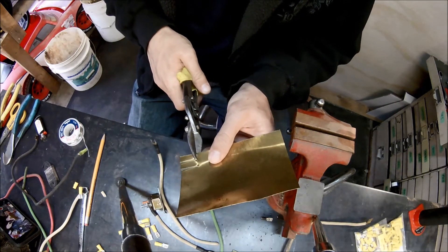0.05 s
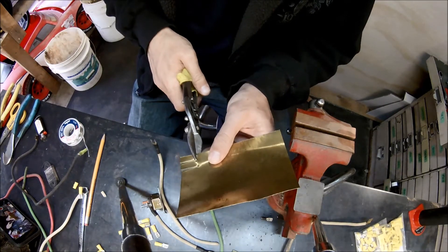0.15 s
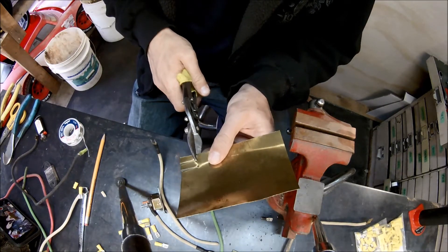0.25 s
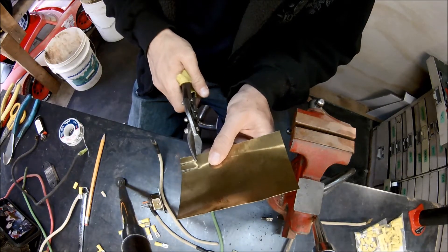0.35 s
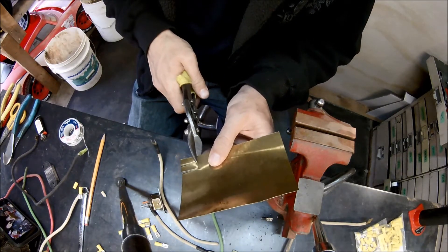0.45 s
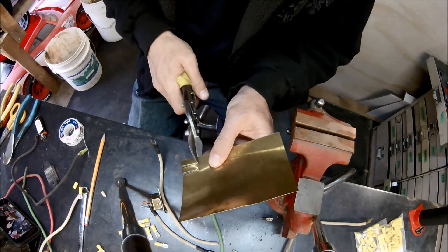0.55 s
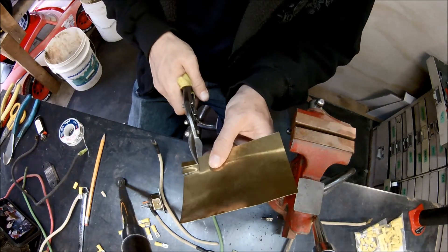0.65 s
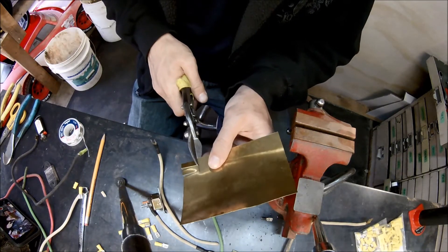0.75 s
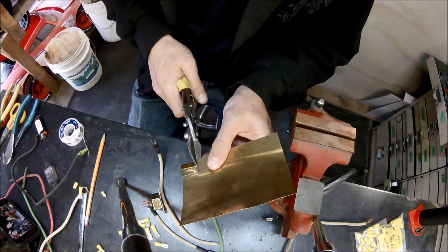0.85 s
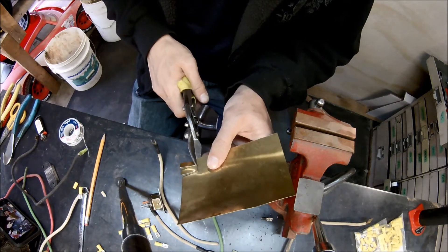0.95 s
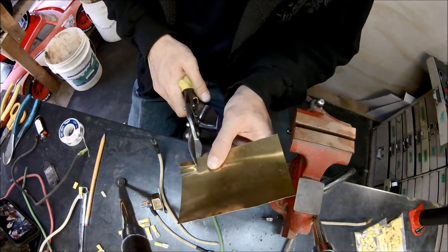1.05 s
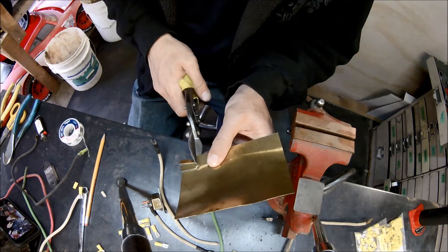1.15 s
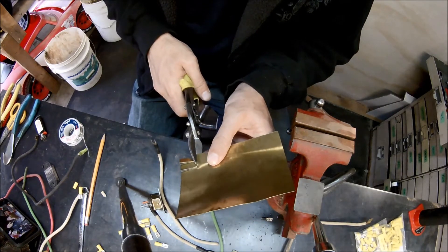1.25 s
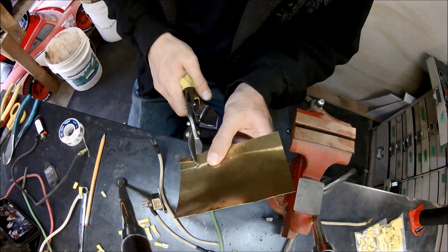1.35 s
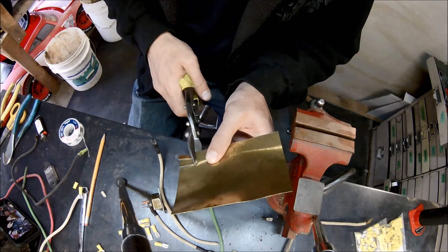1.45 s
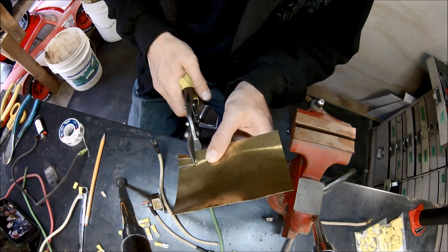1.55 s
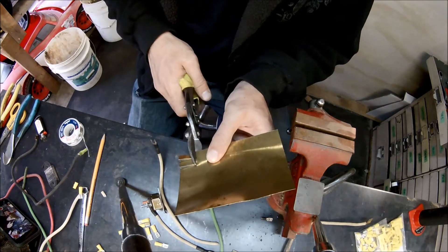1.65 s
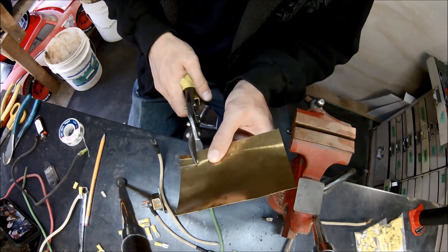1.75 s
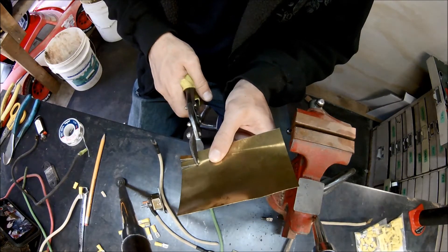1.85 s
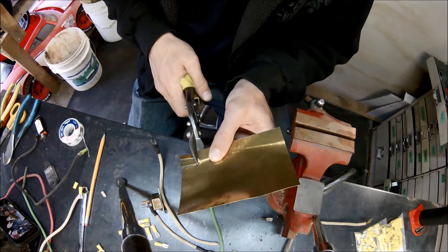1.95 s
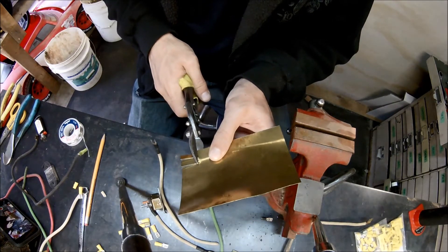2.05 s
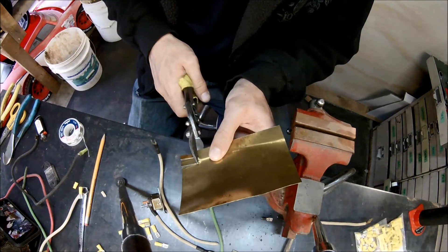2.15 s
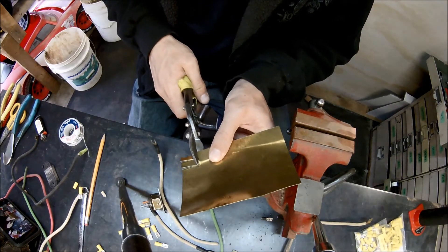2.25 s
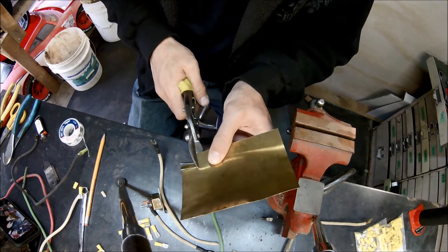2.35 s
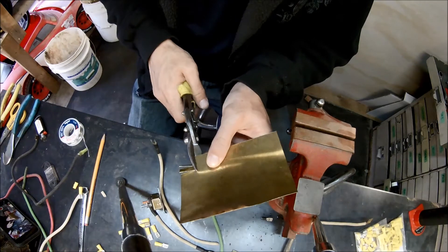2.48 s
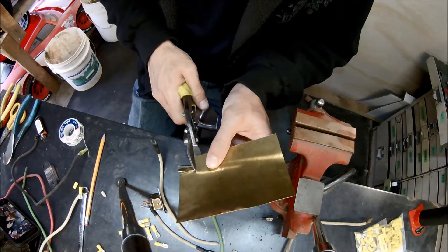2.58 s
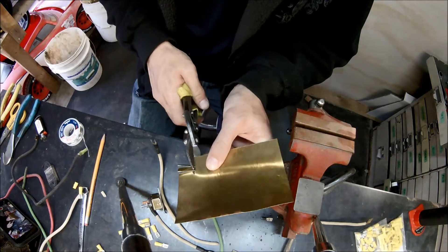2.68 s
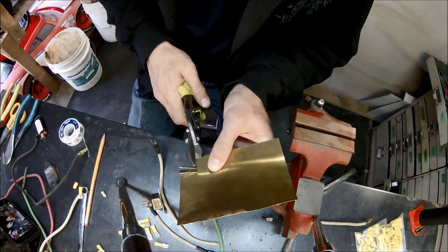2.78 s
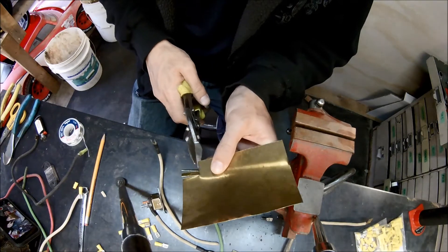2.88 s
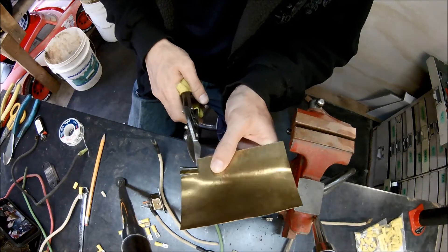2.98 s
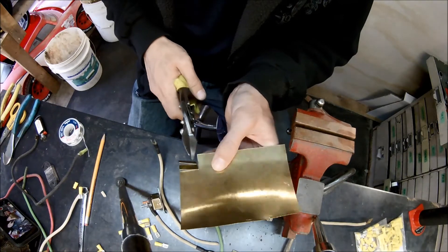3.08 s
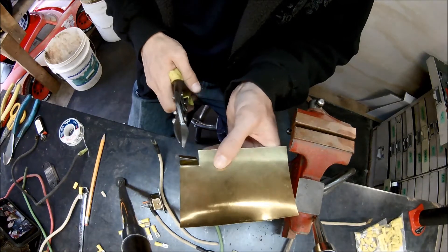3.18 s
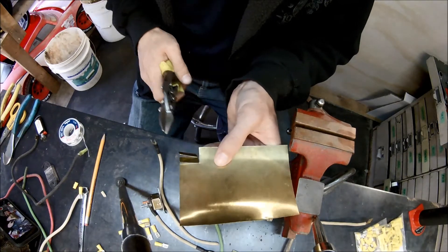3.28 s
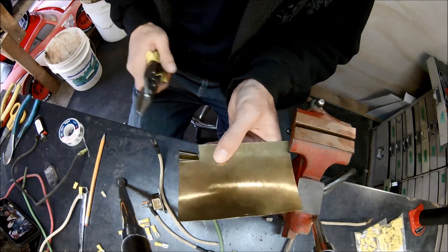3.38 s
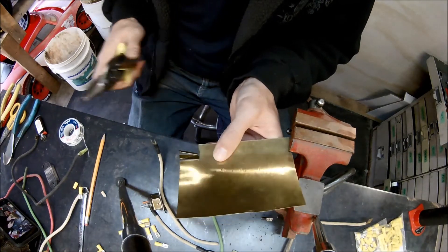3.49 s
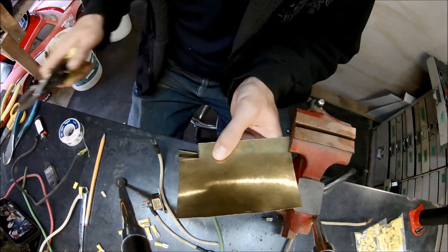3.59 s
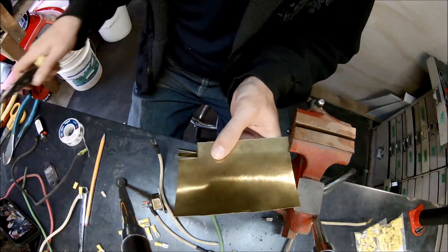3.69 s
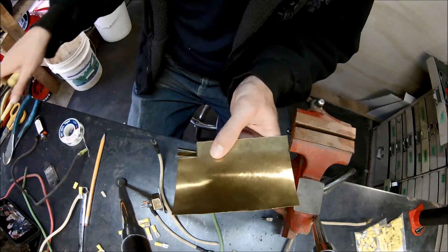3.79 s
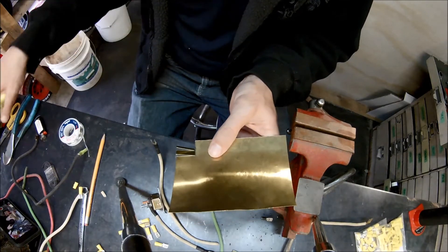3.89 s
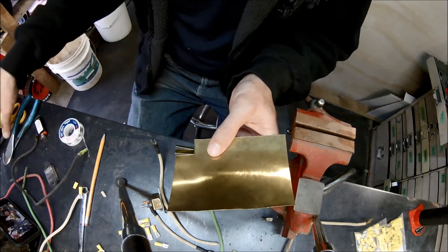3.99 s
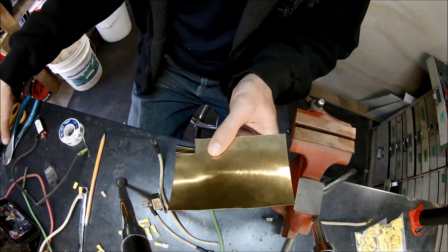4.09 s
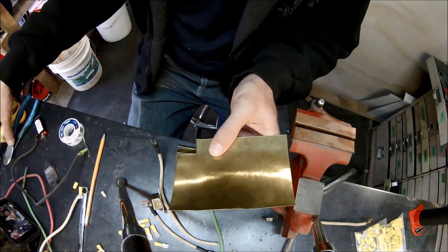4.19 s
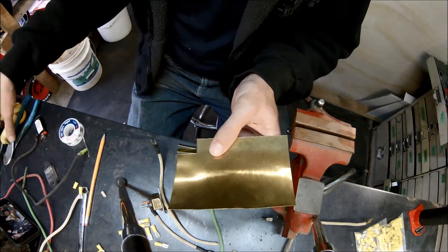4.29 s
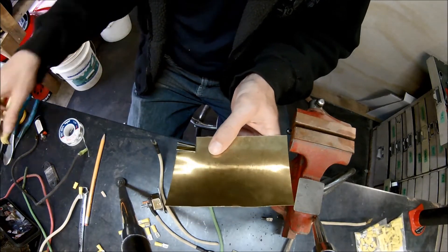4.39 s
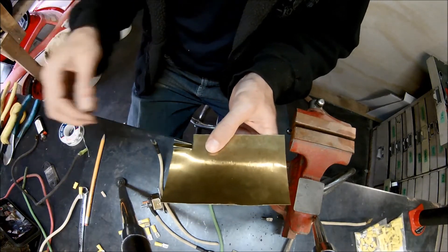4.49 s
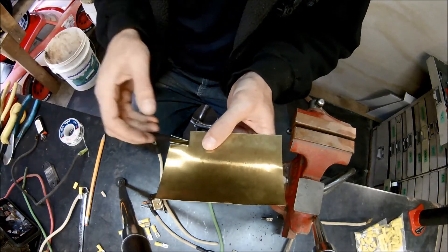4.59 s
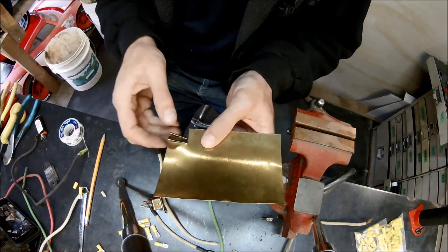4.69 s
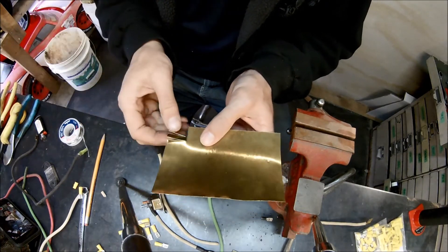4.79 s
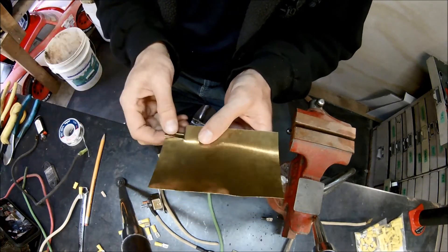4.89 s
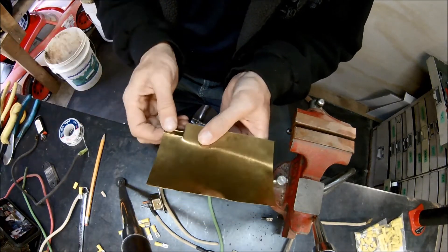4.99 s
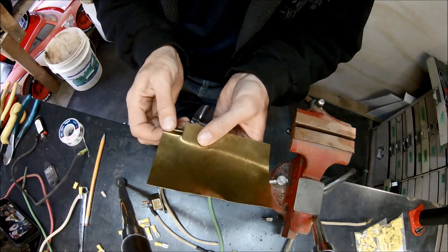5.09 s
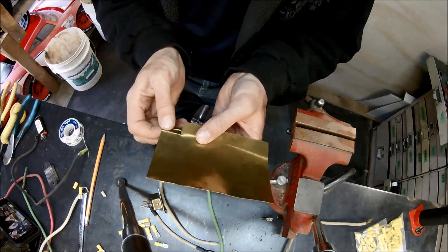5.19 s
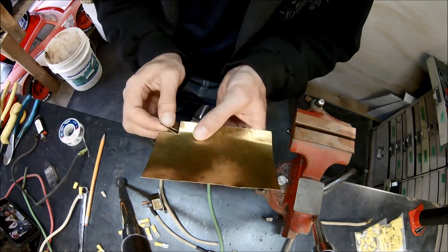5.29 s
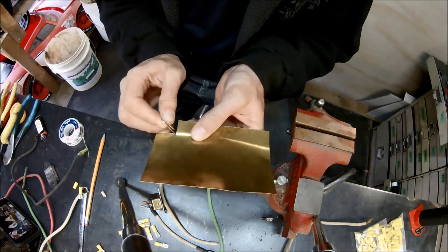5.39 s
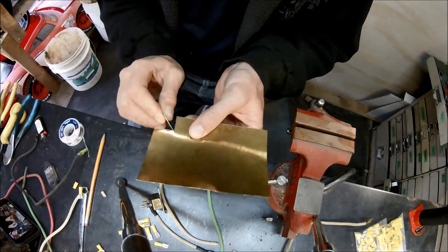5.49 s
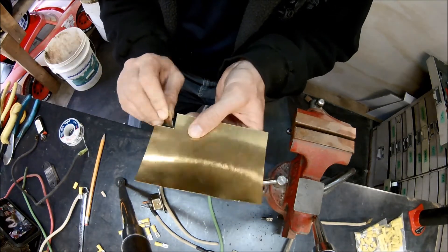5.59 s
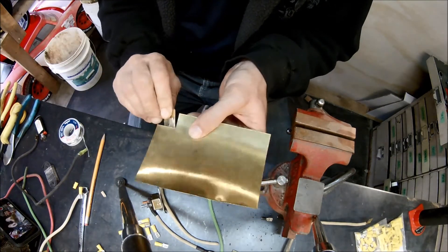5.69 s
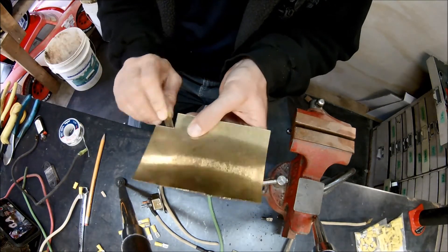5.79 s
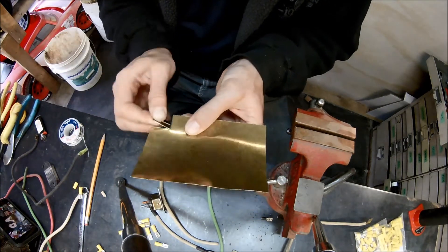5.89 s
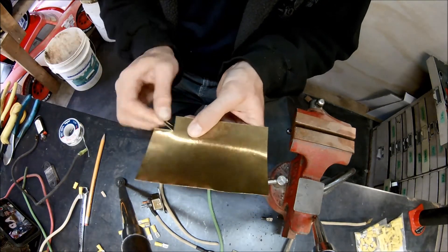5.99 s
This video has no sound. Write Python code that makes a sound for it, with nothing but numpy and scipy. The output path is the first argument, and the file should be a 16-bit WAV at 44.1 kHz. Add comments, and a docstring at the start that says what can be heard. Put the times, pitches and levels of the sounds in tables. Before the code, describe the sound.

Close dry clicks of snips nibbling thin brass, a dull low rumble, tools knocked down onto a bench, then a soft brief singing metal tab.

```python
"""Room tone of a small quiet workshop, then close ticks: hand snips nibble a thin brass sheet over a bench.
Each bite sends a burst of chatter into the sheet's decaying modes and a coloured noise rasp; grit makes
the scrapes, and noise bands a low rumble. The snips go down on a cluttered bench: modes, rattle, clinks
and a thud. Fingers bend the cut tab, which sings once as a gliding tone and ticks. Near sounds get a
short room tail and a microphone housing's shading; hum and hiss lie behind."""
import sys
import numpy as np
from scipy import signal
from scipy.fft import rfft, irfft
from scipy.io import wavfile

SR = 44100
rng = np.random.default_rng(int(sys.argv[2]) if len(sys.argv) > 2 else 0)


def transcribe(u):
    """Save the signal u as a 16-bit wav file named by the first command-line argument.

    u: samples, shape (n,) or (channels, n), limited to [-1, 1]; the rate is SR.
    q: integer samples, one column per channel.
    """
    v = np.clip(np.atleast_2d(u).T, -1, 1)
    q = np.round(v * 32767).astype(np.int16)
    wavfile.write(sys.argv[1], SR, q)


N = 266496
T = np.arange(N) / SR

# modes of the brass sheet before the grip damps them: (frequency [Hz], level [dB], t60 [s])
SHEET_MODES = [(290, 9, 0.088), (407, 9.5, 0.066), (495, -2.5, 0.32), (707, -8, 0.25), (756, 0.5, 0.19),
               (826, -1, 0.23), (906, 2, 0.13), (1086, -10, 0.27), (1110, -4, 0.13), (1250, -7, 0.08),
               (1285, -3, 0.041), (1447, -4, 0.041), (1589, -3.5, 0.056), (1807, -9.5, 0.12),
               (1927, -0.5, 0.042), (2080, -6, 0.05), (2185, -4.5, 0.09), (2390, -3, 0.07),
               (2537, -20, 0.14), (3060, -9, .1), (3490, -15, 0.088), (3410, -1.5, 0.048),
               (3900, -20, 0.058), (3756, -8, 0.09), (4110, -6, 0.05), (4380, -15, 0.11), (4900, -8, .06),
               (5630, -17, .12), (6550, -1.5, .08)]
# ticks on the sheet: (time [s], dry peak [dB], colour centre [Hz], bright edge level [dB], grip t60 [s])
SHEET_TICKS = [(0.582, -48, 1330, -20, .02), (.651, -57, 1240, -27, .03),
               (0.6709, -37.5, 1470, -11.5, 0.034), (.677, -39.5, 1470, -18, 0.039),
               (0.705, -43, 1320, -16, 0.044), (.71, -33, 1580, -14, .036), (1.067, -48, 1200, -25, .042),
               (1.0794, -21.5, 1700, -15.5, 0.029), (1.095, -42, 1295, -5, 0.085),
               (1.12, -46, 1500, -4, 0.044), (1.128, -45, 1800, -1, 0.034), (1.277, -53, 1480, -17, 0.13),
               (1.298, -51, 1170, -21, 0.098), (1.46, -51, 1340, -27, .02), (1.5074, -40, 1300, -11, 0.055),
               (1.516, -46, 1200, -18, .045), (1.53, -54, 1210, -20, .066), (1.546, -44, 1300, -20, .06),
               (1.556, -51.5, 1410, -12, .067), (1.578, -49.5, 1100, -20, 0.047),
               (1.649, -51, 1380, -14, .022), (2.3778, -41.5, 1360, -11, 0.033),
               (2.392, -45, 1320, -15, 0.042), (2.4, -46, 1500, -14, 0.051), (2.413, -47, 1310, -13, 0.036),
               (2.4242, -31, 1370, -18, 0.059), (2.451, -46, 1590, -15, .042),
               (2.708, -40.5, 1880, -7, .038), (2.712, -30, 1870, 19.5, 0.051),
               (2.755, -58.5, 2030, 4, .044), (2.833, -51.5, 1300, -15, .04), (2.869, -51, 1300, -20, .062),
               (2.885, -53, 980, -21, .044), (3.2779, -39.5, 1940, -22, .09),
               (3.287, -45, 2150, -17, 0.051), (3.443, -48, 1150, -4, .0091), (4.905, -66, 1700, -16, .086),
               (5.125, -57, 1710, -20, .084), (5.201, -59, 1810, -20, .045), (5.34, -55, 1493, -6, .07),
               (5.362, -45, 1560, -17, 0.043), (5.369, -43, 1400, -20, 0.047)]
# bright tones of the cut edge and blades: (frequency [Hz], half-width at -6 dB [octaves], level [dB])
EDGE_TONES = [(3720, 0.15, -0.5), (5760, 0.1, -15), (6740, .08, -21)]
# modes a grip leaves free, ringing on after a tick: (time [s], dry peak [dB], frequency [Hz], t60 [s])
FREE_RINGS = [(.71, -54, 915, 0.21), (.728, -58, 1640, .14), (1.5076, -49.5, 720, .072),
              (1.546, -57, 870, 0.068), (2.392, -46, 1316, .1), (2.413, -46.5, 1300, 0.13),
              (2.4244, -51, 1132, 0.28), (2.712, -54.5, 926, 0.29), (2.712, -46, 3480, .11),
              (2.712, -48, 4030, .09), (2.833, -47.5, 926, .08), (2.87, -65, 2235, 0.28),
              (2.885, -50, 885, 0.047), (3.2777, -44.5, 480, .042), (3.287, -56, 1150, .13),
              (4.905, -61, 874, .13), (5.362, -56, 490, .06), (5.364, -47, 862, .1), (5.364, -49, 897, .09),
              (5.365, -51, 1180, .1), (5.365, -55, 1630, .11), (5.365, -54, 1900, .06)]
# blades or fingers rubbing the sheet:
# (time at full level [s], level [dB rms], rise [s], hold [s], fall [s])
SCRAPES = [(0.683, -54.5, 0.0028, .004, .04), (1.297, -64, 0.094, .004, .05),
           (1.518, -59.5, .003, 0.03, .05), (2.386, -61, .003, .03, .01), (2.635, -60, 0.033, .065, .005),
           (2.838, -61.5, .003, .045, 0.055), (4.91, -66, 0.09, .005, .07),
           (5.123, -63.5, .06, .004, 0.055), (5.344, -55.5, 0.036, .01, 0.011),
           (5.372, -54, .004, .008, 0.021), (5.768, -72, .15, 0.0045, 0.076)]
# bench top with its clutter, before extra damping: (frequency [Hz], level [dB], t60 [s])
BENCH_MODES = [(130, -14.5, 0.315), (196, -9, 0.14), (327, 0, 0.11), (383, -2, 0.29), (419.4, -1.5, 0.244),
               (527, -8, 0.19), (630, -12, .2), (732, 0.5, 0.091), (815, 0, 0.094), (841, -6, 0.23),
               (980, -2, 0.14), (1060, -3, 0.16), (1129, -1, 0.18), (1212, -4, 0.17), (1387, -6, 0.26),
               (1533, -6, 0.22), (1932, -4, 0.12), (2840, -13.5, 0.091), (3720, -16, .12), (3900, -17, .1),
               (4150, -18, .1)]
# snips meeting the bench:
# (time [s], dry peak of the whole knock, modes and rattle together [dB], treble tilt [dB per octave])
BENCH_KNOCKS = [(4.09, -55.5, -2), (4.139, -36.5, 2.5), (4.159, -37, -1), (4.174, -31, -1),
                (4.188, -31.5, 2.5), (4.209, -37.5, 2), (4.28, -33, 1.1), (4.286, -11, 2.5),
                (4.29, -13.5, 0.6), (4.299, -23, -1.5), (4.309, -24, -1.2), (4.319, -18, 2),
                (4.332, -23, 0), (4.344, -22, 0.5), (4.364, -29.5, 1.3), (4.401, -33, -2),
                (4.418, -36.5, -3), (4.439, -46.5, -8)]
# noisy part of a knock before its tilt: (frequency [Hz], relative density [dB per Hz])
KNOCK_COLOUR = [(47, -43), (80, -15), (194, -27), (393, -7.5), (573, -6), (798, 2), (911, -0.5),
                (1210, -3.5), (2410, -17.5), (2690, -16.5), (5230, -34.5), (5970, -24.5), (7960, -39),
                (11100, -44.5), (15800, -63)]
# steel parts of the snips clinking together: (time [s], dry peak [dB])
STEEL_CLINKS = [(4.142, -53), (4.176, -45), (4.1888, -42.5), (4.286, -32.5), (4.3196, -33), (4.3444, -52)]
# bench frame shaken: (time [s], dry peak [dB], base of the noise band [Hz], t60 [s])
FRAME_THUDS = [(4.19, -49.5, 70, 0.37), (4.297, -37, 59.7, 0.57)]
# the cut tab slipping under a finger: (time [s], pitch [Hz], fundamental level [dB rms])
TAB_GLIDE = [(5.003, 405, -61), (5.011, 401, -55), (5.033, 432, -47), (5.061, 426, -43),
             (5.105, 439, -53.5), (5.173, 429, -56), (5.26, 430, -80)]
# overtones of the tab: (multiple of the pitch, level against the fundamental [dB])
TAB_OVERTONES = [(2, -21), (3, -37), (4, -41), (6, -44), (7, -39)]
# single modes that hold until a touch stops them, first the sheet as the blades let go, then something
# hollow on the bench:
# (frequency [Hz], time at full level [s], level [dB rms], rise [s], hold [s], fall [s])
HELD_MODES = [(855, 3.279, -42, 0.0023, 0.031, 0.018), (870, 3.33, -61.5, .01, 0.019, 0.056),
              (630, 4.355, -40, 0.084, 0.0094, 0.043), (622, 4.424, -46, .04, 0.01, 0.023)]
# low part of the rumble: (time at full level [s], level [dB rms], rise [s], hold [s], fall [s])
RUMBLE_LOW = [(2.628, -43.5, .02, .15, .05), (2.797, -53.5, .02, 0.11, 0.42)]
# upper part of the rumble: (time at full level [s], level [dB rms], rise [s], hold [s], fall [s])
RUMBLE_HIGH = [(2.63, -45, .02, 0.091, 0.11), (2.8, -65, .02, 0.089, 0.54)]
# colour of the room tone and hiss: (frequency [Hz], relative density [dB per Hz])
SHOP_COLOUR = [(12, -30), (20, 0), (162, -4), (254, -8.5), (284, -10), (408, -11), (443, -12.5), (496, -12),
               (797, -16.5), (1390, -21), (1790, -24), (2720, -28), (8790, -37), (14500, -35), (15800, -32)]
# faint hum: (frequency [Hz], level [dB rms])
HUM_TONES = [(118.5, -76)]
# shading by the microphone housing: (frequency [Hz], gain [dB])
HOUSING_GAIN = [(100, 2), (5000, -3.5), (7300, -10.5), (7950, -17), (8500, -9), (11000, -5.5), (12800, -11),
                (13400, -8), (14200, 3), (15500, -6)]

TICK_SPREAD = 0.58  # half-width of a tick's colour at -6 dB, octaves
LOW_CUT_RATIO = 2.6  # low cut of each tick: colour centre divided by this, keeping ticks thin
# the mode that every tick wakes; its level is relative to the tick
LOOSE_HZ, LOOSE_DB, LOOSE_T60_S = 919, -17.5, 0.11
BEAT_HZ = 4  # spacing of each pair of free modes
RATTLE_T60_S, RATTLE_DB = .07, 7.5  # loose things after each knock; peak over that of the bench modes
CLINK_HZ, CLINK_T60_S = 5640, .021
SWELL_DB = 20  # how far a swell climbs in its rise time and drops in its fall time
SHOP_DB = -63.5  # rms level of room tone and hiss
ROOM_T60_S, ROOM_DB, ROOM_GAP_S, ROOM_DULL_HZ = .25, -11, .004, 4000
TOP_HZ = 15800  # upper limit of the recorder


def ticks():
    """Each bite chatters into the gripped sheet; modes that the grip leaves free ring on."""
    out = np.zeros(N)
    for s, peak_db, centre_hz, edge_db, grip_t60 in SHEET_TICKS:
        add(out, s, peak_db, gripped_tick(peak_db, centre_hz, edge_db, grip_t60))
        add(out, s, peak_db + LOOSE_DB, free_mode(LOOSE_HZ, LOOSE_T60_S))
    for s, peak_db, hz, t60 in FREE_RINGS:
        add(out, s, peak_db, free_mode(hz, t60))
    return out


def gripped_tick(peak_db, centre_hz, edge_db, grip_t60):
    """A bite excites damped sheet modes and a noise rasp of the same colour."""
    t = T[:SR // 3]
    mode_hz = np.array(SHEET_MODES)[:, 0]
    modes = ring(SHEET_MODES, tick_colour(mode_hz, centre_hz, edge_db), t) * fade(t, 1.14 * grip_t60)
    body = signal.fftconvolve(blow(t, grip_t60, -16.5), modes)[:len(t)]
    grid_hz = np.geomspace(200, 12000, num=60)
    points = np.c_[grid_hz, tick_colour(grid_hz, centre_hz, edge_db)]
    crack_db = 9.0 + 0.28 * (peak_db + 41)  # harder bites crack more sharply
    rasp = colour(rng.standard_normal(len(t)), points)
    rasp = rasp * (fade(t, grip_t60) + undb(crack_db) * fade(t, 0.0047))
    tick = body / np.abs(body).max() + undb(1.0) * rasp / np.abs(rasp).max()
    onset = np.minimum(t / 0.0004, 1)
    return band(tick * onset, centre_hz / LOW_CUT_RATIO, 14000)


def tick_colour(hz, centre_hz, edge_db):
    """Level in dB over frequency: one broad hill, the bright edge tones and a low floor."""
    hill = undb(bump_db(hz, centre_hz, TICK_SPREAD))
    edge = sum(undb(edge_db + db + bump_db(hz, f, width)) for f, width, db in EDGE_TONES)
    return 20 * np.log10(hill + edge + undb(-50))


def free_mode(hz, t60):
    """Two nearly equal modes beat as they decay."""
    t = T[:SR // 3]
    pair = np.sin(2 * np.pi * hz * t) + 0.78 * np.sin(2 * np.pi * (hz + BEAT_HZ) * t - 1.2)
    return fade(t, t60) * pair * np.minimum(t / 0.00065, 1)


def scrape():
    """Stick-slip grit under the blades or fingers, heard through the damped sheet."""
    t = T[:SR // 8]
    lift_db = -5 * np.log2(np.array(SHEET_MODES)[:, 0] / 1200) ** 2  # favours modes near 1200 Hz
    held = ring(SHEET_MODES, lift_db, t) * fade(t, 0.083)
    rub = unit(signal.fftconvolve(grit(N, 1300, 2.46), held)[:N])
    return rub * sum(swell(*row) for row in SCRAPES)


def knocks():
    """Steel on wood: bench modes plus a dense rattle of loose things."""
    out, t = np.zeros(N), T[:SR // 2]
    mode_hz = np.array(BENCH_MODES)[:, 0]
    for s, peak_db, tilt_db in BENCH_KNOCKS:
        modes = ring(BENCH_MODES, tilt_db * np.log2(mode_hz / 1000), t) * fade(t, 2.9 * RATTLE_T60_S)
        body = signal.fftconvolve(blow(t, RATTLE_T60_S, -13.5), modes)[:len(t)]
        points = [(f, db + tilt_db * np.log2(f / 1000)) for f, db in KNOCK_COLOUR]
        rattle = colour(rng.standard_normal(len(t)), points)
        envelope = fade(t, RATTLE_T60_S) + undb(-1.5) * fade(t, 0.008)
        rattle = rattle * envelope * np.minimum(t / 0.00089, 1)
        knock = body / np.abs(body).max() + undb(RATTLE_DB) * rattle / np.abs(rattle).max()
        add(out, s, peak_db, knock)
    return out


def clinks():
    """Steel on steel: short bright bursts of band-passed noise."""
    out, t = np.zeros(N), T[:SR // 10]
    for s, peak_db in STEEL_CLINKS:
        burst = rng.standard_normal(len(t)) * fade(t, CLINK_T60_S)
        add(out, s, peak_db, band(burst, CLINK_HZ / 1.03, CLINK_HZ * 1.26))
    return out


def thud():
    """The bench frame shudders as decaying low noise while the snips land."""
    out, t = np.zeros(N), T[:SR // 2]
    for s, peak_db, hz, t60 in FRAME_THUDS:
        shudder = band(rng.standard_normal(len(t)), hz * 1.03, hz * 2.43)
        add(out, s, peak_db, shudder * fade(t, t60))
    return out


def tab_note():
    """The slipping tab sings a nearly pure gliding note with faint overtones."""
    s, hz, db = np.transpose(TAB_GLIDE)
    phase = 2 * np.pi * np.cumsum(np.interp(T, s, hz)) / SR
    overtones = sum(undb(d) * np.sin(k * phase) for k, d in TAB_OVERTONES)
    wave = np.sin(phase) + overtones
    edges = np.clip(np.minimum(T - s[0], s[-1] - T) / .002, 0, 1)
    return np.sqrt(2) * wave * curve(np.c_[s, db]) * edges


def held_notes():
    """Single modes sound as pure notes on swells."""
    return sum(np.sqrt(2) * np.sin(2 * np.pi * hz * T) * swell(*shape) for hz, *shape in HELD_MODES)


def rumble():
    """Dull turbulent thuds: two low noise bands, the higher near 90 Hz, and an upper noise."""
    noise = rng.standard_normal((3, N))
    low = unit(unit(band(noise[0], 28, 57)) + unit(band(noise[1], 75.5, 101)))
    # (frequency [Hz], level [dB])
    upper_colour = [(100, 3.5), (180, 2.0), (400, -5.5), (600, -16), (850, -9.5), (1500, -29), (3000, -69)]
    upper = unit(colour(noise[2], upper_colour))
    low_level = sum(swell(*row) for row in RUMBLE_LOW)
    upper_level = sum(swell(*row) for row in RUMBLE_HIGH)
    return low * low_level + upper * upper_level


def shop():
    """Room tone and microphone hiss as steady coloured noise, with a faint sine hum."""
    hum = sum(undb(db) * np.sqrt(2) * np.sin(2 * np.pi * hz * T) for hz, db in HUM_TONES)
    return undb(SHOP_DB) * unit(colour(rng.standard_normal(N), SHOP_COLOUR)) + hum


def room(x):
    """Small workshop: a short diffuse tail after a gap, treble dying twice as fast."""
    t = T[:SR // 2]
    noise = rng.standard_normal(len(t))
    low = signal.lfilter(*signal.butter(1, ROOM_DULL_HZ, fs=SR), noise)
    treble = (noise - low) * fade(t, ROOM_T60_S)
    tail = (low + treble) * fade(t, ROOM_T60_S) * (t > ROOM_GAP_S)
    return undb(ROOM_DB) * signal.fftconvolve(x, tail / np.sqrt(np.sum(tail ** 2)))[:N]


def housing(x):
    """The microphone housing shades the sound through a short symmetric filter."""
    hz, db = np.transpose(HOUSING_GAIN)
    f = np.linspace(0, SR / 2, num=513)
    gain = undb(np.interp(np.log(np.maximum(f, 1)), np.log(hz), db))
    return signal.fftconvolve(x, signal.firwin2(201, f, gain, fs=SR), "same")


def ring(modes, lift_db, t):
    """Impulse response as decaying modes; signs are random and pitches are jittered slightly at each call."""
    hz, db, t60 = np.transpose(modes)[:, :, None]
    chance = rng.standard_normal((2, len(modes), 1))
    sign = np.sign(chance[0])
    jittered_hz = hz * (1 + 0.0089 * chance[1])
    level = sign * undb(db + lift_db[:, None])
    return np.sum(level * fade(t, t60) * np.sin(2 * np.pi * jittered_hz * t), axis=0)


def grit(count, per_s, spread_db):
    """Sparse random micro-impacts with a long-tailed size."""
    hit = rng.random(count) < per_s / SR
    return hit * rng.choice([-1., 1.], count) * undb(spread_db * rng.exponential(size=count))


def blow(t, t60, chatter_db):
    """One hard impulse followed by dying chatter."""
    push = undb(chatter_db) * grit(len(t), 1500, 2.87) * fade(t, t60)
    push[0] = 1
    return push


def swell(s, db, rise, hold, fall):
    """Gain that climbs to db at time s, holds and drops, in straight lines of dB."""
    before = (s - T) / max(rise, 1e-3)
    after = (T - s - hold) / max(fall, 1e-3)
    return undb(db - SWELL_DB * np.clip(np.maximum(before, after), 0, 9))


def curve(table, silence_db=-120):
    """Gain from a (time [s], level [dB]) table, practically silent outside it."""
    return undb(np.interp(T, *np.transpose(table)[:2], silence_db, silence_db))


def bump_db(hz, centre_hz, spread):
    """A hill in dB on a log-frequency axis, 6 dB down at spread octaves."""
    return -6 * (np.log2(hz / centre_hz) / max(spread, .05)) ** 2


def colour(x, points):
    """Shape a noise by (frequency [Hz], level [dB]) points."""
    hz, db = np.transpose(points)
    f = np.maximum(np.fft.rfftfreq(len(x), 1 / SR), 1)
    return irfft(rfft(x) * undb(np.interp(np.log(f), np.log(hz), db)), len(x))


def band(x, lo_hz, hi_hz):
    """Band-pass."""
    return signal.sosfilt(signal.butter(2, [lo_hz, hi_hz], "band", fs=SR, output="sos"), x)


def fade(t, t60):
    """Exponential decay, 60 dB down after t60."""
    return np.exp(-np.log(1000) * t / np.maximum(t60, 1e-3))


def undb(db):
    """Decibels to gain."""
    return 10 ** (np.asarray(db, float) / 20)


def unit(x):
    """Scale to rms 1."""
    return x / np.sqrt(np.mean(x ** 2))


def add(out, s, peak_db, x):
    """Mix a sound in at time s with the given peak."""
    i = int(s * SR)
    x = x[:N - i]
    out[i:i + len(x)] += undb(peak_db) * x / np.abs(x).max()


def scene():
    """Impacts and scrapes pass the room and housing; notes, rumble and room tone are added directly."""
    near = ticks() + scrape() + knocks() + clinks() + thud()
    notes = tab_note() + held_notes()
    return (housing(near + room(near)) + notes + rumble() + shop())[None]


def record(dry):
    """The recorder cuts the top with a steep low-pass."""
    return signal.sosfilt(signal.ellip(10, .2, 60, TOP_HZ, fs=SR, output="sos"), dry)


dry = scene()
out = record(dry)
transcribe(out)
```